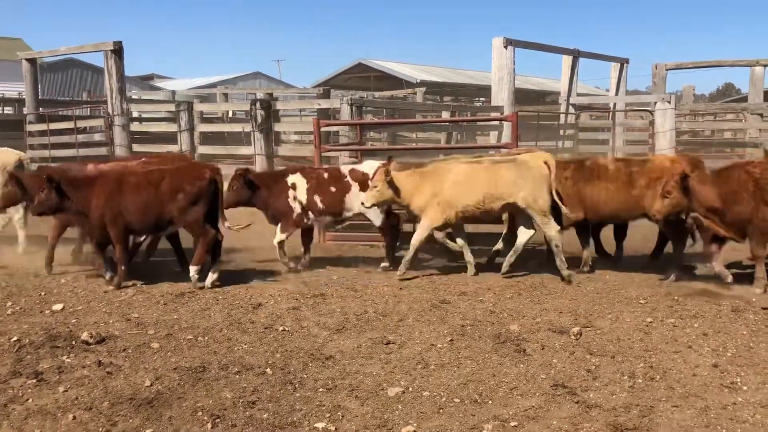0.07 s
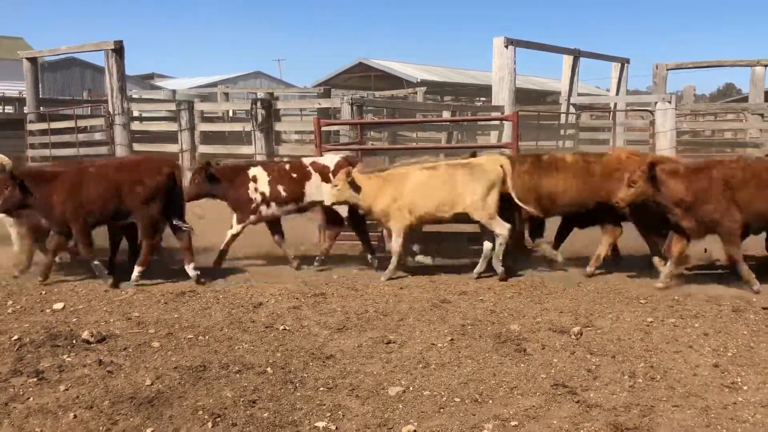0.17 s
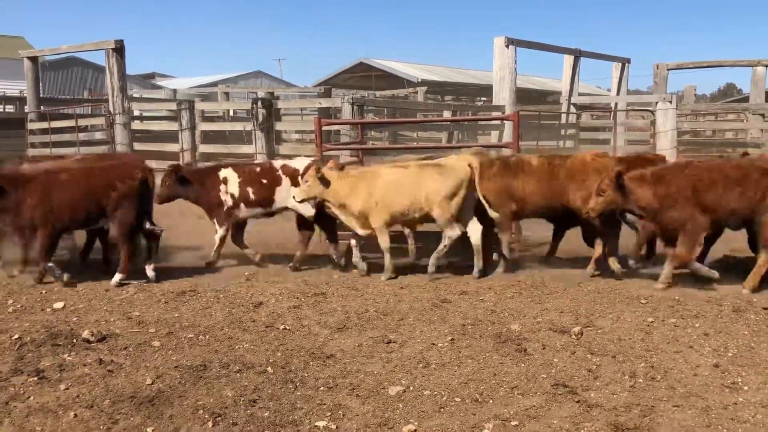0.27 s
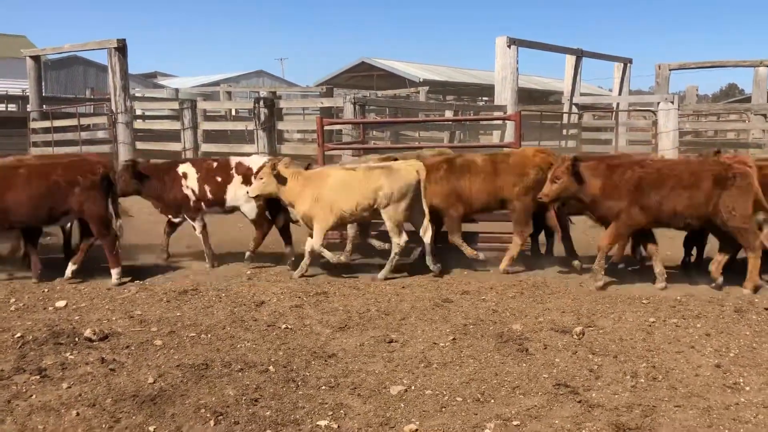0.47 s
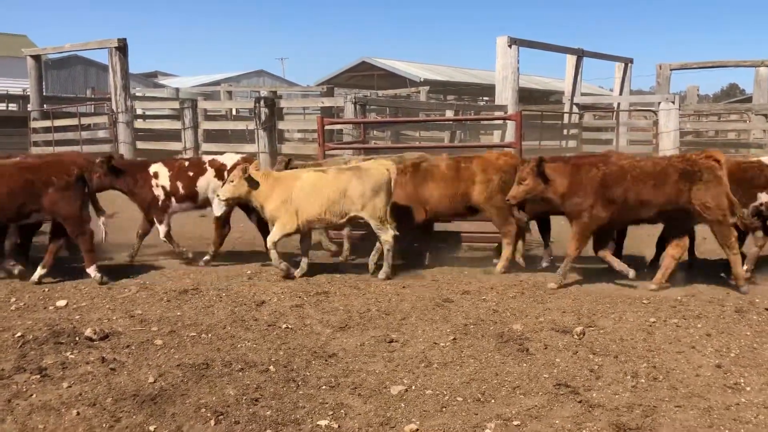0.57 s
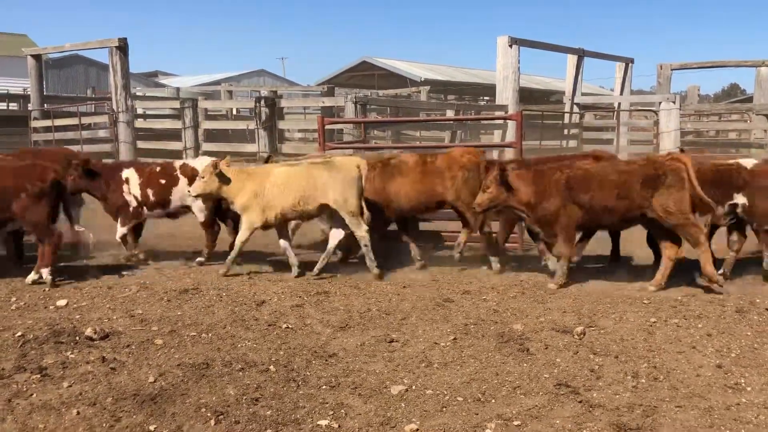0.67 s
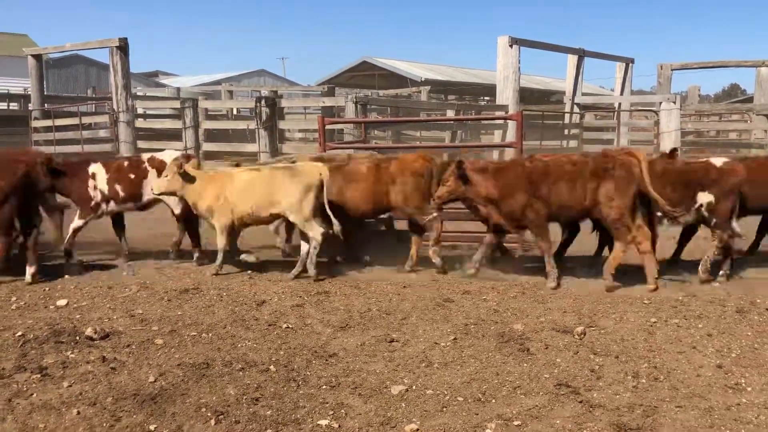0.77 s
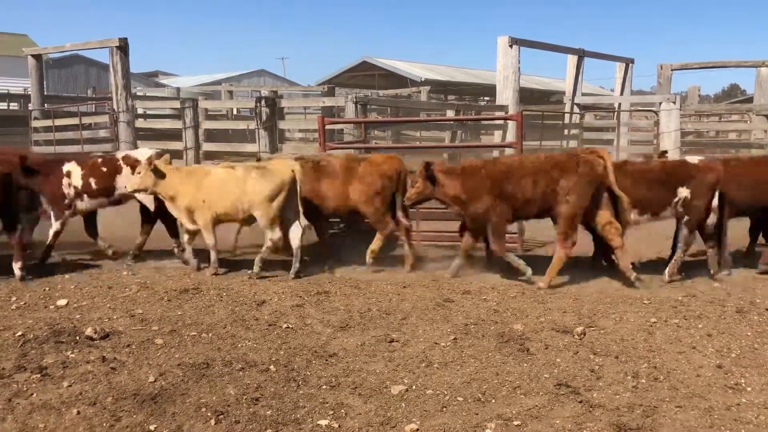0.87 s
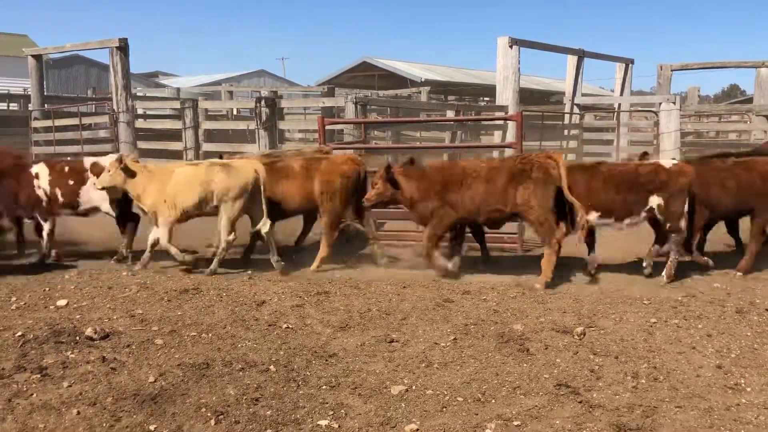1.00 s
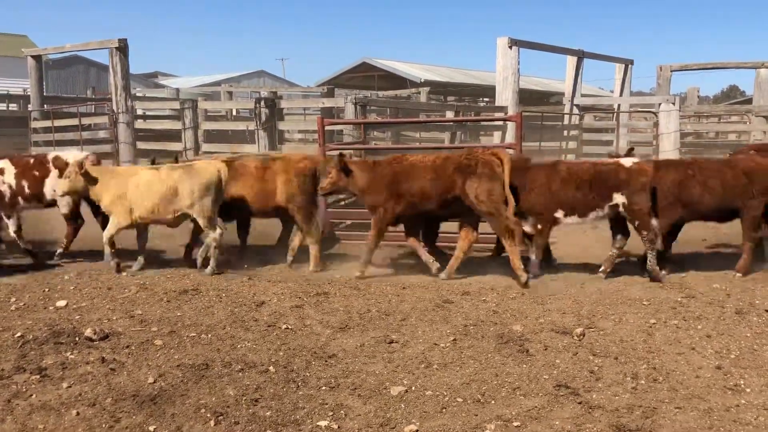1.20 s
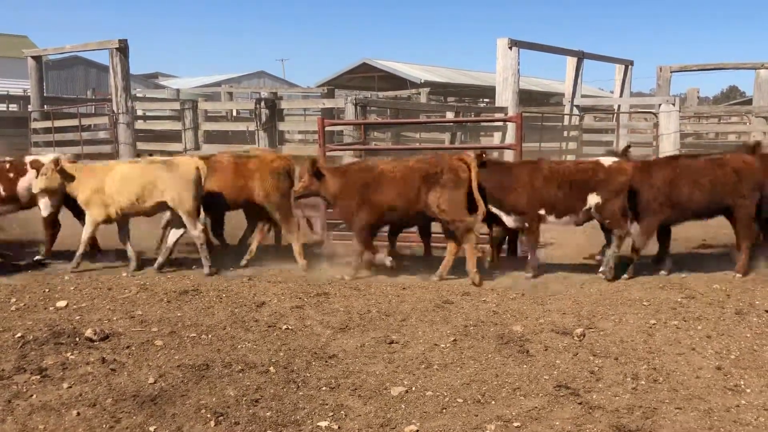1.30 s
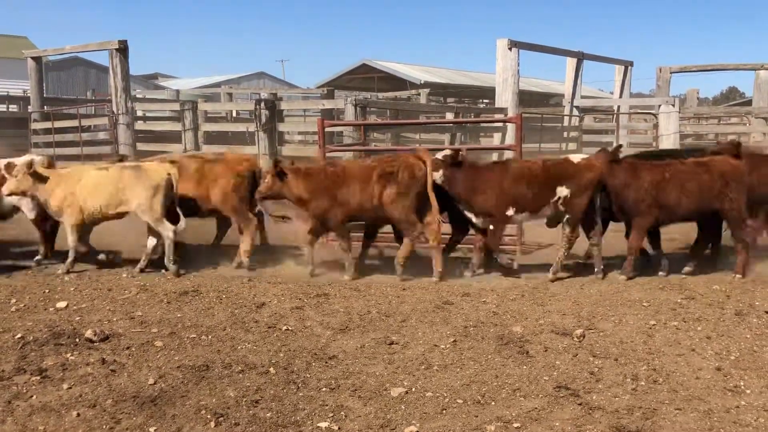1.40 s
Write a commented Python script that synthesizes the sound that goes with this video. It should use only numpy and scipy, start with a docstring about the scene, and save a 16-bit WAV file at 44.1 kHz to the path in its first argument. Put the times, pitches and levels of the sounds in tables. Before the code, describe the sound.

Cattle walking over dry ground, dull uneven hoofbeats and small pebble clicks.

```python
"""Cattle crossing a dry dirt yard

Faint wind and the dull patter of the herd run behind the near hooves. Each hoof knocks on the
crust, thumps the packed ground and shifts loose soil. Grit crunches underfoot; struck pebbles
click and skid."""
import sys
import numpy as np
from scipy import signal
from scipy.fft import rfft, irfft, next_fast_len
from scipy.io import wavfile

SR = 44100
rng = np.random.default_rng(int(sys.argv[2]) if len(sys.argv) > 2 else 0)


def wav_record(signal):
    """Record a signal, one row per channel, as 16-bit PCM in the file named by sys.argv[1]."""
    frames = np.transpose(np.atleast_2d(signal))
    bounded = np.clip(frames, -1, 1)
    # unit amplitude maps onto the largest positive 16-bit level
    quanta = np.round(bounded * 32767).astype(np.int16)
    wavfile.write(sys.argv[1], SR, quanta)


N = 63945
TIME_S = np.arange(N) / SR

# Noise spectra. Each row: frequency in Hz, relative density in dB.
WIND_SPECTRUM = [(20, -54), (35, -15), (60, 5.5), (100, -9), (200, -12.5), (500, -31.5), (1500, -36.5),
                 (4000, -43.5), (10000, -49.5), (16000, -55)]
HERD_SPECTRUM = [(50, -13.5), (100, 16.5), (200, 0), (500, -20.5), (1000, -21), (2000, -39.5)]
CLOD_SPECTRUM = [(300, 1.5), (700, 7), (1400, 2), (2400, -3.5), (4000, -3.5), (16000, -66)]
SAND_SPECTRUM = [(800, -13.5), (2000, -3), (4000, 2), (7000, 2.5), (11000, -4.5), (16000, -6)]
SOIL_SPECTRUM = [(60, -24.5), (150, 7.5), (300, -2), (600, -10.5), (1000, -32.5), (2000, -44.5),
                 (8000, -47)]
# Distant patter. Each row: time in seconds, level in dB.
HERD_LEVELS = [(0, -34), (0.12, -44), (0.3, -39), (0.6, -42.5), (0.7, -63), (0.79, -38.5), (0.92, -39.5),
               (1.0, -50), (1.13, -40), (1.18, -45), (1.36, -37)]
# Grit under a hoof. Each row: centre in seconds, half-width in seconds, clods in dB, sand in dB.
CRUNCHES = [(0.02, 0.014, -42, -46.5), (0.043, 0.02, -44.5, -51.5), (0.089, 0.018, -51.5, -55.5),
            (0.171, 0.03, -46, -62), (0.232, 0.011, -41, -43.5), (0.296, 0.016, -47.5, -55),
            (0.323, 0.0095, -49.5, -56.5), (0.447, 0.026, -54.5, -57.5), (0.546, 0.0076, -48, -48),
            (0.576, 0.016, -46.5, -54), (0.686, 0.021, -50, -52), (0.833, 0.013, -46.5, -50),
            (0.86, 0.012, -40, -48), (0.976, 0.01, -48, -66), (1.023, 0.048, -52.5, -57.5),
            (1.137, 0.027, -46, -53), (1.187, 0.018, -52.5, -51.5), (1.203, 0.0073, -41.5, -68),
            (1.234, 0.013, -53, -51), (1.264, 0.011, -47, -53.5), (1.325, 0.011, -69, -44.5),
            (1.35, 0.0083, -46, -51), (1.431, 0.011, -44.5, -66)]
# Near hooves. Each row: time in seconds, knock level in dB, knock pitch in Hz,
# thump level in dB, thump pitch in Hz.
HOOF_FALLS = [(0.003, -31.5, 403, -23.5, 91), (0.087, -38.5, 256, -36.5, 75), (0.185, -26.5, 231, -23, 67),
              (0.211, -25, 239, -23.5, 95), (0.244, -24.5, 183, -19.5, 116), (0.253, -48, 215, -14, 69.4),
              (0.2708, -10.5, 550, -6, 76.6), (0.303, -33.5, 285, -24.5, 65.4),
              (0.341, -25.5, 490, -32.5, 76), (0.3718, -23, 477, -21, 134), (0.380, -33.5, 335, -26, 69.4),
              (0.481, -39, 203, -33.5, 137), (0.504, -17, 501, -33, 150), (0.525, -31, 460, -36, 121),
              (0.557, -27.5, 380, -31, 110), (0.603, -40, 223, -40, 98), (0.755, -35, 256, -47, 98),
              (0.774, -38.5, 327, -40, 84), (0.825, -26.5, 286, -28.5, 68.6), (0.851, -39, 414, -26.5, 61),
              (0.878, -21.5, 213, -22, 83), (0.974, -36, 770, -50, 81), (1.063, -29.5, 180, -28, 84),
              (1.079, -28, 470, -40, 131), (1.103, -28.5, 227, -27, 91), (1.242, -18, 316, -16.5, 146),
              (1.310, -26.5, 375, -28.5, 126), (1.336, -32, 206, -34, 93), (1.37, -29.5, 260, -29, 77)]
# Struck pebbles. Each row: start in seconds, relative level in dB, pitch in Hz, relative bandwidth.
PEBBLE_HITS = [(0.0782, -34, 6800, 0.14), (0.154, -17, 4200, 0.42), (0.2302, -20.5, 2530, 0.3),
               (0.2825, -29, 9100, 0.33), (0.323, -22.5, 8100, .4), (0.3353, -26.5, 1540, 0.17),
               (0.368, -32.5, 6900, 0.19), (0.5419, -20, 3540, 0.17), (0.5706, -24.5, 6500, 0.62),
               (0.6952, -29, 4250, 0.13), (0.814, -27.5, 10400, 0.56), (0.825, -22.5, 4840, 0.27),
               (0.8534, -32, 6000, 0.36), (1.0088, -28.5, 9500, 0.82), (1.0224, -22.5, 7700, 0.26),
               (1.026, -22.5, 5550, 0.12), (1.1291, -29.5, 3950, 0.42), (1.138, -31.5, 7500, .5),
               (1.171, -31.5, 3220, 0.2), (1.1979, -20, 2680, 0.3)]


def from_db(db):
    return 10 ** (np.asarray(db) / 20)


def unit_rms(x):
    return x / np.sqrt(np.mean(x ** 2) + 1e-20)


def colour(x, spectrum):
    """Minimum-phase filter to the given spectrum; output rms 1."""
    size = 2 * next_fast_len(N)
    hz, db = np.transpose(spectrum)
    bins_hz = np.maximum(np.arange(size // 2 + 1) * SR / size, 1)
    gain = from_db(np.interp(np.log(bins_hz), np.log(hz), db))
    gain /= np.sqrt(1 + (.5 * hz[0] / bins_hz) ** 4)  # low cut
    cepstrum = irfft(np.log(gain))
    cepstrum[1:size // 2] *= 2
    cepstrum[size // 2 + 1:] = 0
    response = np.exp(rfft(cepstrum))
    return unit_rms(irfft(rfft(x, size) * response)[:N])


def grains(per_s, spread_db):
    """Random clicks of uneven size."""
    sizes = from_db(spread_db * np.minimum(rng.exponential(1, N), 5))
    return (rng.random(N) < per_s / SR) * sizes * rng.choice([-1, 1], N)


def wind(level_db=-45.5, sway_db=4):
    """Faint rumble and hiss, swaying in level."""
    sway = np.interp(TIME_S, np.linspace(0, TIME_S[-1], num=16), rng.standard_normal(16))
    return from_db(level_db + sway_db * sway) * colour(rng.standard_normal(N), WIND_SPECTRUM)


def herd_patter():
    """Distant hooves merge into a dull patter."""
    level_db = np.interp(TIME_S, *np.transpose(HERD_LEVELS))
    return from_db(level_db) * colour(grains(per_s=240, spread_db=1), HERD_SPECTRUM)


def grit(clod_bed_db=-59, sand_bed_db=-65):
    """Clods and sand crackle faintly throughout, louder where a hoof grinds them."""
    centre_s, half_width_s, clod_db, sand_db = np.transpose(CRUNCHES)
    grinding = np.exp(-2 * ((TIME_S[:, None] - centre_s) / half_width_s) ** 2)
    out = np.zeros(N)
    for crunch_db, bed_db, spectrum in ((clod_db, clod_bed_db, CLOD_SPECTRUM),
                                        (sand_db, sand_bed_db, SAND_SPECTRUM)):
        power = from_db(bed_db) ** 2 + grinding @ from_db(crunch_db) ** 2
        out += np.sqrt(power) * colour(grains(per_s=3500, spread_db=4.5), spectrum)
    return out


def soil_puffs(gain_db=-8.5, rise_s=0.011, fall_s=0.017):
    """Loose earth shifts: a dull puff around each knock."""
    power = np.zeros(N)
    for at_s, knock_db, *_ in HOOF_FALLS:
        age_s = TIME_S - at_s
        envelope = np.exp(-np.maximum(-age_s / rise_s, age_s / fall_s))
        power += (from_db(knock_db) * envelope) ** 2
    return from_db(gain_db) * np.sqrt(power) * colour(rng.standard_normal(N), SOIL_SPECTRUM)


def crust_knocks(fade_cycles=1.344, period_growth=1.422, jitter_cycles=0.049, crumble_s=0.0016):
    """Hoof meets crust. Pitch plunges as it beds in; uneven crumbling jitters the phase."""
    sink = np.log(period_growth)
    lowpass = signal.butter(2, .5 / crumble_s, fs=SR, output="sos")
    jitter = jitter_cycles * unit_rms(signal.sosfilt(lowpass, rng.standard_normal(N)))
    out = np.zeros(N)
    for at_s, level_db, pitch_hz, _, _ in HOOF_FALLS:
        period_ratio = np.maximum(1 + sink * pitch_hz * (TIME_S - at_s), 1e-9)
        cycles = np.log(period_ratio) / sink
        envelope = np.exp(-(cycles / fade_cycles) ** 2)
        out += from_db(level_db) * envelope * np.sin(2 * np.pi * (cycles + jitter))
    return out


def ground_thumps(delay_s=0.00048, peak_cycles=0.99, sharpness=3.23):
    """The animal's weight lands: packed ground swings low for two or three cycles."""
    out = np.zeros(N)
    for at_s, _, _, level_db, pitch_hz in HOOF_FALLS:
        cycles = np.maximum(TIME_S - at_s - delay_s, 0) * pitch_hz
        load = cycles / peak_cycles
        envelope = (load * np.exp(1 - load)) ** sharpness
        out += from_db(level_db) * envelope * np.sin(2 * np.pi * cycles)
    return out


def pebble_clicks(gain_db=-9, crack_s=0.00055, skid_db=-16.5, skid_s=0.0093):
    """Each pebble cracks in one broad resonance, then skids."""
    out = np.zeros(N)
    for start_s, level_db, pitch_hz, width in PEBBLE_HITS:
        age_s = np.maximum(TIME_S - start_s, 0)
        envelope = np.exp(-age_s / crack_s) + from_db(skid_db) * np.exp(-age_s / skid_s)
        contact = (TIME_S >= start_s) * envelope * rng.choice([-1, 1], N)
        low_hz, high_hz = pitch_hz / (1 + width), min(pitch_hz * (1 + width), SR / 2 - 1000)
        resonance = signal.butter(1, [low_hz, high_hz], "band", fs=SR, output="sos")
        band_makeup = np.sqrt(SR / 2 / (high_hz - low_hz))
        out += from_db(level_db + gain_db) * band_makeup * signal.sosfilt(resonance, contact + 1e-18)
    return out


def scene():
    """Near hooves, herd and wind in the open; mono."""
    hooves = crust_knocks() + ground_thumps() + soil_puffs() + pebble_clicks() + grit()
    return (hooves + herd_patter() + wind())[None]


def record(dry, cutoff_hz=16000):
    """Steep low-pass."""
    return signal.sosfilt(signal.ellip(10, .1, 80, cutoff_hz, fs=SR, output="sos"), dry)


dry = scene()
out = record(dry)
wav_record(out)
```